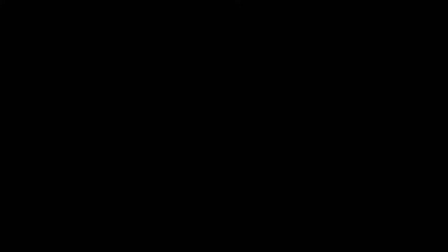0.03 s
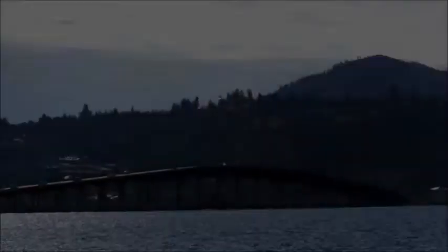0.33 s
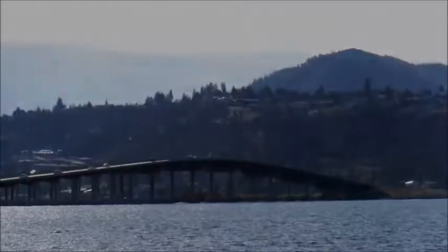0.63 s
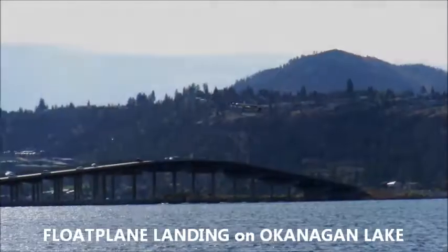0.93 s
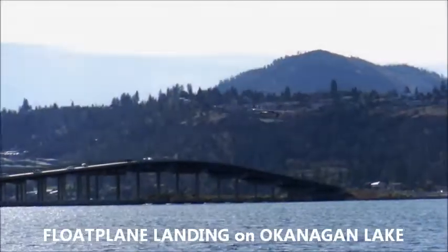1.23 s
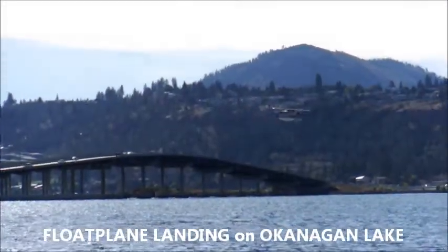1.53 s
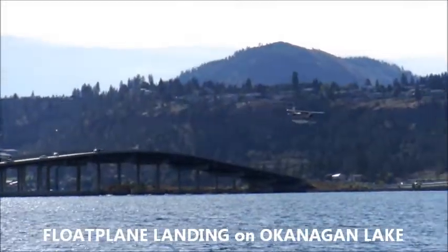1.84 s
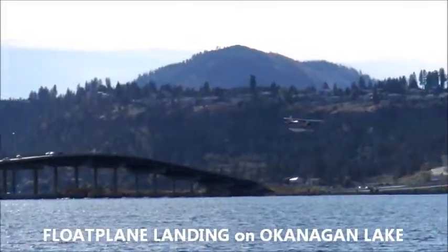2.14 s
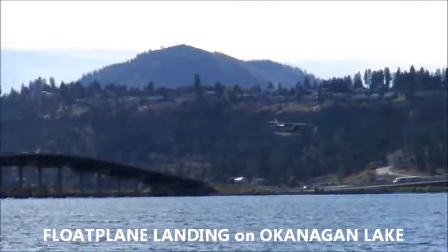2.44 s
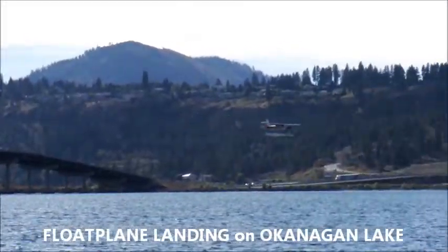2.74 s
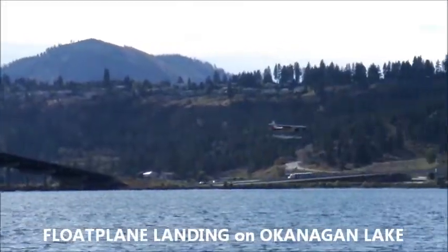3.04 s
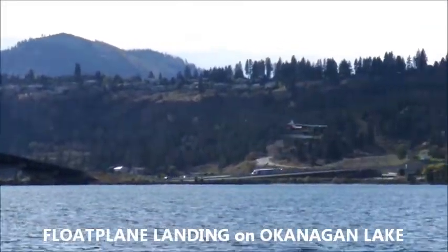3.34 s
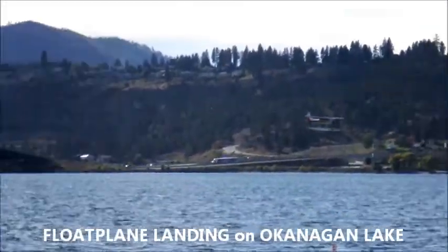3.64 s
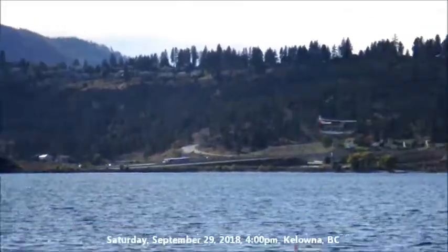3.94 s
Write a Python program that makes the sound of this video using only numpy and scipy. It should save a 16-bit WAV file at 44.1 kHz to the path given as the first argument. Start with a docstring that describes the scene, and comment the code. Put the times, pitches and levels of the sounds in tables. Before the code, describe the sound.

Water washes softly at a breezy shore, with far engines droning and one sharp tap.

```python
"""Wavelets wash and fizz at a breezy lake shore: soft noise, tiny ringing bubbles and bursting drops.
Behind them, wind and far traffic make a broad, steady rush, with singing tyres and low engine drones.
Near the end, air pockets in the water give a hollow plop, and a small hard part taps sharply beside
the microphone. The recorder notches out three narrow bands of the treble."""
import sys
import numpy as np
from scipy import signal
from scipy.fft import rfft, irfft
from scipy.io import wavfile

SR = 44100
rng = np.random.default_rng(int(sys.argv[2]) if len(sys.argv) > 2 else 0)


def int16_out(signal):
    """Quantize to a 16-bit WAV file."""
    q = np.round(np.clip(np.atleast_2d(signal).T, -1, 1) * 32767)
    wavfile.write(sys.argv[1], SR, q.astype(np.int16))


N = 176400
TIME = np.arange(N) / SR
FREQS = np.maximum(np.arange(N // 2 + 1) * SR / N, 1)


def from_db(db):
    """Decibels to gain."""
    return 10 ** (np.asarray(db) / 20)


def rms_one(x):
    """Scale to unit rms."""
    return x / np.sqrt(np.mean(x ** 2) + 1e-20)


def panned(pan_db):
    """Left and right gains for a level difference; positive leans left."""
    return rms_one(from_db(np.array([[pan_db], [-pan_db]]) / 2))


def in_time(rows):
    """Automation curves: each column after the time, at every sample."""
    times, *columns = np.transpose(rows)
    return [np.interp(TIME, times, column) for column in columns]


def at_hz(points, hz):
    """The columns of a spectrum at given frequencies."""
    known, *columns = np.transpose(points)
    return np.array([np.interp(np.log(hz), np.log(known), column) for column in columns])


def drift(rate_hz):
    """A smooth random wobble of about unit rms, mostly slower than rate_hz."""
    hop, settle = 40, 2000
    pole = np.exp(-2 * np.pi * hop * rate_hz / SR)
    noise = rng.standard_normal(N // hop + settle + 2)
    slow = signal.lfilter([1], [1, -2 * pole, pole * pole], noise)[settle:]
    return np.interp(np.arange(N) / hop, np.arange(len(slow)), rms_one(slow))


def ring(clicks, hz, t60):
    """A resonator: a unit click starts a sine of height 1 that falls 60 dB in t60 seconds."""
    pole, angle = np.exp(-np.log(1000) / (t60 * SR)), 2 * np.pi * hz / SR
    return signal.lfilter([np.sin(angle), 0], [1, -2 * pole * np.cos(angle), pole ** 2], clicks + 1e-18)


def coloured(x, spectrum):
    """Apply an EQ curve, then scale to unit rms."""
    return rms_one(irfft(rfft(x) * from_db(at_hz(spectrum, FREQS)), N))


def stereo_noise(spectrum, likeness):
    """Coloured noise whose stereo width depends on frequency."""
    mid, side = rfft(rng.standard_normal((2, N)))
    alike = np.clip(at_hz(likeness, FREQS), 0, .999)
    left_right = np.sqrt(1 + alike) * mid + np.sqrt(1 - alike) * side * [[1], [-1]]
    return coloured(irfft(left_right, N), spectrum)


def split(x, centres_hz):
    """Overlapping bands that sum to the whole."""
    whole = rfft(x)
    weights = [np.interp(np.log(FREQS), np.log(centres_hz), row) for row in np.eye(len(centres_hz))]
    return [irfft(whole * weight, N) for weight in weights]


def patchy(x, depth_db, rate_hz):
    """Every octave flickers by itself."""
    octaves = split(x, np.geomspace(60, 15360, 9))
    return sum(band * from_db(depth_db * drift(rate_hz)) for band in octaves)


def rush():
    """Wind and far traffic: a smooth roar whose low, middle and upper ranges swell slowly."""
    # The roar's colour. Each row: frequency in Hz, relative level in dB.
    colour = [(15, -42), (25, -38), (45, -22), (68, -3.5), (82, -2.5), (128, 3), (165, 0.5), (230, -2),
              (300, -6.5), (450, -6), (560, -1.5), (670, 0.5), (800, -0.5), (1000, 1.6), (1250, -0.3),
              (1550, -3), (2000, -9.5), (2600, -16.5), (4000, -43.5)]
    # Its stereo image. Each row: frequency in Hz, left-right likeness from 0 to 1.
    likeness = [(50, .6), (100, 0.94), (200, 0.82), (340, 0.92), (520, 0.98), (1000, 0.99), (2000, 0.97)]
    # The swell of each range. Each row: time in seconds, gain in dB.
    low_swell = [(.2, 0), (.46, 3.2), (.57, 1.3), (.69, 3.5), (.84, 0.5), (1.27, 0), (1.8, 0), (2.5, -2.5),
                 (3.2, -0.5), (4, -3)]
    middle_swell = [(.2, -1.2), (.65, 2.1), (1.25, -1), (2.1, -1.4), (2.65, 2.8), (2.9, -0.3), (3.2, 2.8),
                    (3.45, 1.1), (3.7, 1.8), (4, -0.45)]
    upper_swell = [(.2, -1.3), (.85, -1.3), (1.3, 0.24), (2.3, -0.27), (3.2, 0.91), (3.55, -.3), (4, .7)]
    bands = split(stereo_noise(colour, likeness), centres_hz=(220, 695, 1160))
    roar = 0
    for band, swell, pan_db in zip(bands, (low_swell, middle_swell, upper_swell), (-3.5, -3.5, -5)):
        swell_db, = in_time(swell)
        roar = roar + band * from_db(swell_db) * panned(pan_db)
    return from_db(-37.5) * patchy(roar, depth_db=.87, rate_hz=6.6)


def tyres():
    """Tyres on a far bridge sing in one broad resonance that lifts, then sinks as the traffic moves."""
    # The tyres' song. Each row: time in seconds, centre in Hz, level in dB.
    song = [(.2, 1000, -50), (1.2, 1118, -46), (1.7, 1059, -46), (2.3, 1021, -49), (3.1, 1001, -47),
            (3.6, 962, -48), (4, 977, -54)]
    hz, db = in_time(song)
    half_width_hz = 112
    pole = np.exp(-2 * np.pi * half_width_hz / SR)
    rumble = signal.lfilter([1], [1, -2 * pole, pole * pole], rng.standard_normal((2, N)))
    phase = 2 * np.pi * np.cumsum(hz) / SR
    band = rumble[0] * np.cos(phase) + rumble[1] * np.sin(phase)  # shifted up to the centre
    return from_db(db) * rms_one(band) * panned(-3.5)


def engine(course, harmonics_db):
    """Only the lowest harmonics cross the water, each fading with the wind and fluttering at each ear."""
    pitch_wander, fade_depth_db, flutter_depth_db = .00807, 2.3, 2
    hz, db = in_time(course)
    phase = 2 * np.pi * np.cumsum(hz * (1 + pitch_wander * drift(4.2))) / SR
    drone = 0
    for k, harmonic_db in enumerate(harmonics_db, 1):
        flutter_db = flutter_depth_db * np.array([drift(16), drift(16)])
        fade_db = fade_depth_db * drift(2.4)
        tone = np.sin(k * phase + 2 * np.pi * rng.random())
        drone = drone + from_db(db + harmonic_db + fade_db + flutter_db) * tone
    return np.sqrt(2) * drone


def distant_engines():
    """Two engines drone and sink in pitch, the second taking over as the first fades."""
    # Each engine's course. Each row: time in seconds, firing rate in Hz, level in dB.
    first_course = [(.15, 108.3, -54), (.7, 107.5, -47), (1.45, 107.2, -48), (1.8, 103.7, -55.5),
                    (2.3, 103.4, -73)]
    second_course = [(1.3, 100.9, -83), (2, 100.1, -58), (2.45, 99, -53.5), (3.3, 97.85, -52),
                     (3.75, 94.4, -53), (4, 93, -50.5)]
    # Each engine's timbre: the gain of each harmonic in dB, from the fundamental up.
    first_timbre = [-0.5, -21, -12.5, -17]
    second_timbre = [0, -5, -10.5, -8.5]
    first = engine(first_course, first_timbre) * panned(1.5)
    second = engine(second_course, second_timbre) * panned(-2)
    return first + second


def tap():
    """A small hard part touches, snaps home and rebounds more softly: brief cracks and dying modes."""
    # The contacts. Each row: start in seconds, gain in dB, pan in dB, low-pass corner in Hz.
    contacts = [(3.8425, -22.5, 6, 7000), (3.845, -19, 9, 20000), (3.846, -24, 0, 2500),
                (3.8597, -22, 0, 1200)]
    # The part's ring. Each row: pitch in Hz, relative level in dB, seconds to fall 60 dB.
    modes = [(1050, -21, .012), (2900, -11, 0.01), (3540, -7, .006), (4580, 1.5, 0.0081),
             (6550, -7, 0.0036), (7500, -8.5, .004), (9800, -11, 0.0058), (11900, -16, .004),
             (15000, -15, .002)]
    crack_gain, crack_decay_s = from_db(-4.5), .001
    out = np.zeros((2, N))
    for start, db, pan_db, corner_hz in contacts:
        length = N - int(start * SR)
        click = signal.unit_impulse(length)
        decay = np.exp(-np.minimum(np.arange(length) / (crack_decay_s * SR), 20))
        crack = crack_gain * decay * rng.standard_normal((2, length))
        ringing = sum(from_db(mode_db) * ring(click, hz, t60) for hz, mode_db, t60 in modes)
        pole = np.exp(-2 * np.pi * corner_hz / SR)
        hit = signal.lfilter([1 - pole], [1, -pole], crack + ringing)
        out[:, -length:] += from_db(db) * panned(pan_db) * hit
    return out


def plops():
    """A pocket of air swells into a slightly rising note and is cut off as it closes."""
    # The air pockets. Each row: start in seconds, length in seconds, pitch in Hz, gain in dB.
    pockets = [(3.598, 0.02, 860, -31), (3.703, 0.035, 681, -28.5), (3.718, 0.023, 930, -31.5),
               (3.787, .018, 1005, -34)]
    pitch_rise, release_s = .03, .006
    out = 0
    for start, length, hz, db in pockets:
        progress = np.clip((TIME - start) / length, 0, 1)
        envelope = np.sqrt(progress) * np.clip((start + length - TIME) / release_s, 0, 1)
        glide_hz = hz * (1 + pitch_rise * (progress - .5))
        out = out + from_db(db) * envelope * np.sin(2 * np.pi * np.cumsum(glide_hz) / SR)
    return out * panned(-4.5)


def droplets():
    """Single drops burst on the surface; each rings for a few milliseconds."""
    # The clearest drops. Each row: start in seconds, relative level in dB, pitch in Hz,
    # seconds to fall 60 dB.
    drops = [(.413, -37, 8400, 0.0034), (0.4877, -37.5, 8300, 0.0045), (1.3395, -38, 8350, 0.0042),
             (1.552, -37, 4500, .012), (1.558, -42, 7960, 0.0054), (1.8233, -42, 7850, 0.0047),
             (2.3206, -40, 8800, 0.0034), (2.35, -32, 4500, 0.01), (2.409, -34, 4000, 0.0071),
             (2.4106, -33, 8200, 0.0024), (2.423, -31.5, 8200, 0.0027), (2.8614, -37, 8070, 0.004),
             (2.98, -43, 7850, 0.0046), (3.1024, -34, 4200, 0.0085), (3.1403, -37, 7800, 0.0043),
             (3.469, -39, 8100, 0.003), (3.7813, -40, 7430, .009)]
    attack_s = .00035
    out = 0
    for start, db, hz, t60 in drops:
        age = np.maximum(TIME - start, 0)
        attack = 1 - np.exp(-age / attack_s)
        decay = np.exp(-np.log(1000) * np.minimum(age / t60, 10))
        out = out + from_db(db) * attack * decay * np.sin(2 * np.pi * hz * age)
    return 2 * out * panned(-8)


def fizz(wash_db, port_eq):
    """Tiny bubbles and droplets ring for a few cycles, in clumps, more of them as the wash grows."""
    base_per_s, clump_db, ring_cycles = 1500, 2.5, 10.5
    size_spread_db, pan_spread_db = 3, 8.5
    per_s = base_per_s * from_db(wash_db + clump_db * drift(14))
    births = np.flatnonzero(rng.random(N) < per_s / SR)
    sizes = from_db(size_spread_db * np.minimum(rng.exponential(1, N), 5))[births]
    polarity = rng.choice([-1, 1], N)[births]
    pan_db = pan_spread_db * rng.standard_normal(N)[births]
    sides = from_db(np.array([pan_db, -pan_db]) / 2)
    pitches_hz = np.geomspace(1400, 12000, 28)
    pitch_index = rng.integers(0, len(pitches_hz), N)[births]
    bubbles = 0
    for k, hz in enumerate(pitches_hz):
        clicks = np.zeros((2, N))
        clicks[:, births] = sizes * polarity * sides * (pitch_index == k)
        bubbles = bubbles + hz * ring(clicks, hz, ring_cycles / hz)
    return from_db(-49 + wash_db / 2) * coloured(bubbles, port_eq)


def wavelets():
    """A soft wash and its fizz rise and fall together at the water's edge, brighter on the crests."""
    # The lapping of the water. Each row: time in seconds, gain in dB.
    lapping = [(.2, 1), (.32, 0), (.41, 1.8), (.5, 0.4), (.54, -0.5), (1.22, -2.5), (1.32, 1.1),
               (1.46, -0.5), (1.56, .8), (1.78, 0), (2.02, 0.6), (2.12, -2.6), (2.28, -1.5), (2.33, 0.5),
               (2.42, 2), (2.52, -0.9), (2.7, -1.6), (2.8, 1.1), (2.95, .5), (3.13, 2.5), (3.28, 1.5),
               (3.42, 0.5), (3.57, 1), (3.66, 2), (3.82, 1.5), (4, 2.2)]
    # The wash's hiss as heard through the left and right microphone ports, each with its own
    # resonances. Each row: frequency in Hz, relative left and right levels in dB.
    port_eq = [(700, -12.5, -13.5), (1540, -12.5, -3.5), (2100, -28, -1), (2730, -8, -3), (3464, -7, 1),
               (3570, -5, -9), (4130, -15.5, -5.5), (4680, -8, -3), (5290, -17, -10.5), (5880, -29, -23),
               (6620, -17, -22.5), (7130, -26, -15), (7850, -23, -13), (9000, -20.5, -21.5),
               (10200, -23.5, -31), (12500, -31, -33), (16000, -42, -44)]
    # The wash's stereo image. Each row: frequency in Hz, left-right likeness from 0 to 1.
    likeness = [(1500, 0.86), (2400, 0.41), (4500, .6), (6500, 0.15), (12000, .1)]
    brightening = .62  # extra dB in the top for each dB of wash
    wash_db, = in_time(lapping)
    wash = from_db(-45.5 + wash_db) * patchy(stereo_noise(port_eq, likeness), depth_db=1.5, rate_hz=22)
    body, top = split(wash + fizz(wash_db, port_eq), centres_hz=(4500, 7600))
    return body + top * from_db(brightening * wash_db)


def scene():
    """Far engines, rush and tyres behind the near water and the tap."""
    return distant_engines() + rush() + tyres() + wavelets() + droplets() + plops() + tap()


def record(dry):
    """Microphone hiss, three evenly spaced notches, a quick fade-in out of silence and a top cut."""
    notch_spacing_hz, notch_width_hz, cutoff_hz = 2493, 230, 15900
    silence_s, fade_in_s = .17, .01
    x = dry + from_db(-60.5) * rng.standard_normal((2, N))
    for hz in notch_spacing_hz * np.arange(1, 4):
        x = signal.lfilter(*signal.iirnotch(hz, hz / notch_width_hz, fs=SR), x)
    x = x * np.clip((TIME - silence_s) / fade_in_s, 0, 1)
    return signal.sosfilt(signal.ellip(12, .1, 80, cutoff_hz, fs=SR, output="sos"), x)


dry = scene()
out = record(dry)
int16_out(out)
```